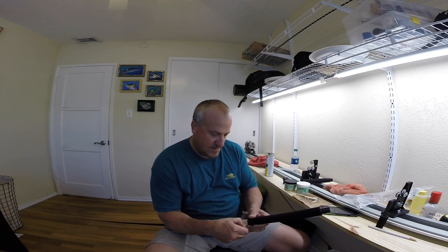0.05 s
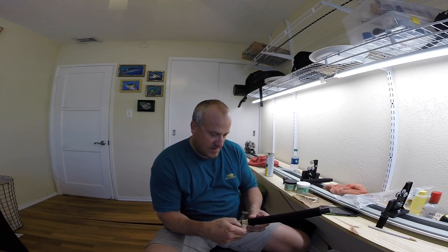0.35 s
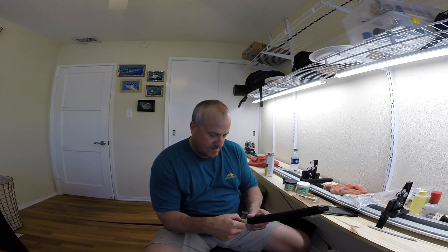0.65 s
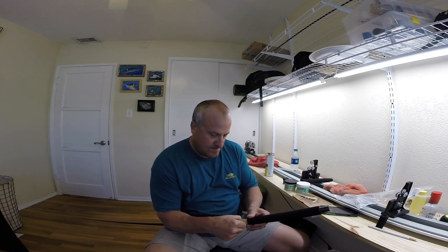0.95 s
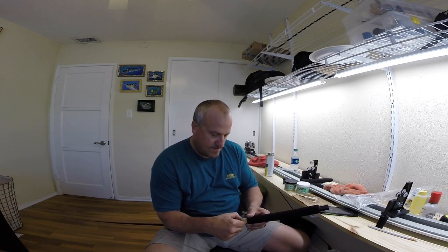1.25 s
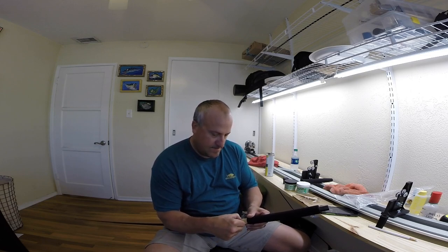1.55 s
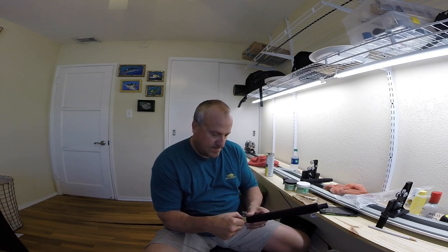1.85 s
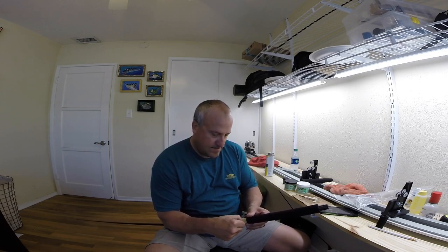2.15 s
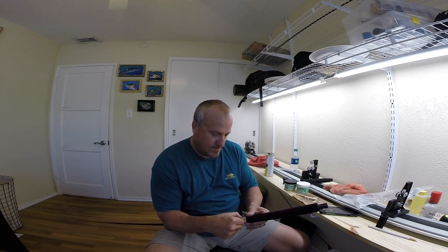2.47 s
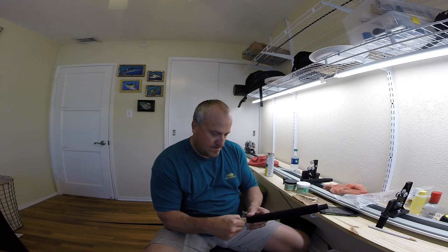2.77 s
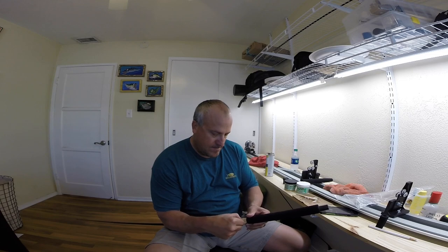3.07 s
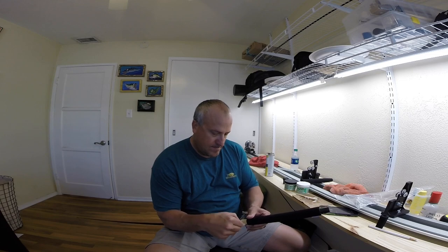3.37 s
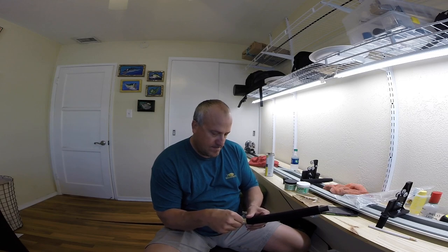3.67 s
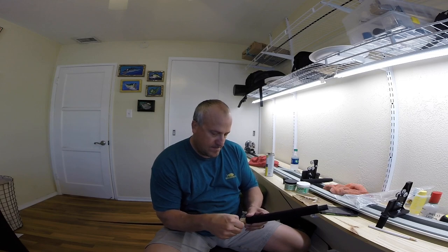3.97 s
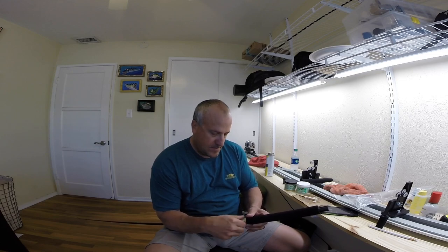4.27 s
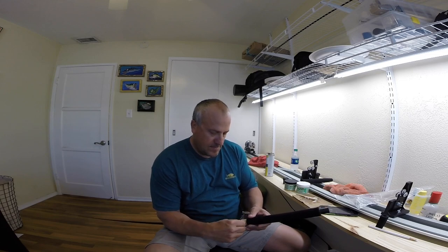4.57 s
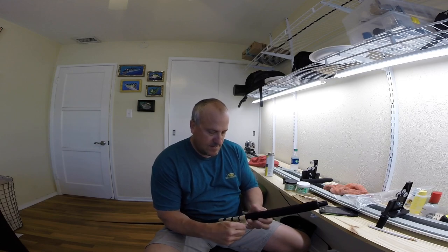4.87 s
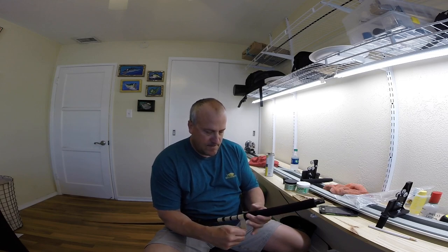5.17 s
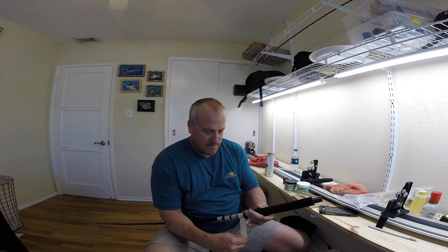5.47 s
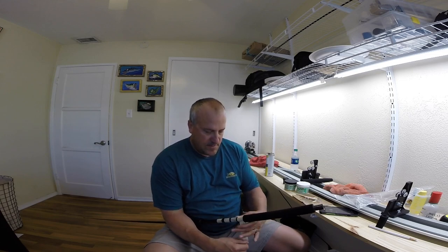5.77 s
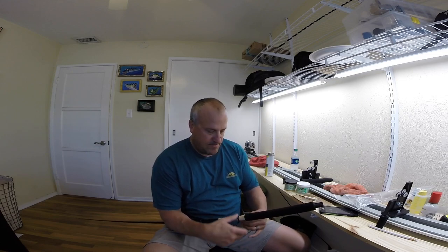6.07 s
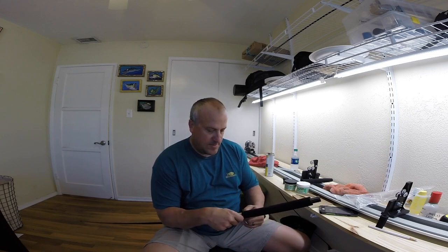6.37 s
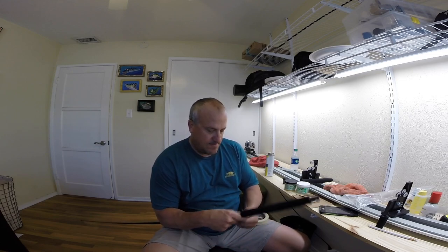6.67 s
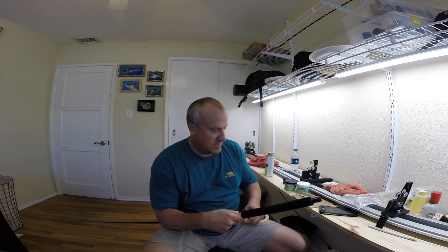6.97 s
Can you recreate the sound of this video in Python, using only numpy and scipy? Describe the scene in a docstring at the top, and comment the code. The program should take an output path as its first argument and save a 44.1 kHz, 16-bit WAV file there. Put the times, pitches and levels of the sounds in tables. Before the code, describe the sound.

Masking tape ticks softly, then is peeled and torn off a fishing rod with crackly rips over a steady low hum.

```python
"""First comes a short rasp of masking tape being picked at, over a steady mains hum.
The tape is being worked on a fishing rod blank: it ticks while taut, then is peeled and torn.
Its glue lets go in swarms of tiny clicks, hands knock, the paper cracks and the thin rod snaps and rings.
The microphone stands well away in a small bare room, so the room carries most of the sound."""
import sys
import numpy as np
from scipy import signal
from scipy.fft import rfft, irfft, next_fast_len
from scipy.io import wavfile
from scipy.ndimage import uniform_filter1d

SR = 44100
rng = np.random.default_rng(int(sys.argv[2]) if len(sys.argv) > 2 else 0)


def to_wav(sig):
    """Store sig (one row per channel, or 1-D mono) as 16-bit WAV at the path in sys.argv[1].

    Samples outside -1..1 are clipped; the rate is SR.
    """
    pcm = np.clip(np.atleast_2d(sig), -1, 1) * 32767
    pcm = np.round(pcm).astype(np.int16)
    wavfile.write(sys.argv[1], SR, pcm.T)  # frames by channels


N = 314433

# The tones of the mains hum. Each row: pitch in Hz, average (rms) level in dB.
HUM = [(60, -44), (120, -57.5), (180, -84)]
# A "colour" says how strong the lows and highs are. Each row: frequency in Hz, relative level in dB.
AIR_COLOUR = [(90, -8.5), (140, 2), (300, -3), (520, -7), (1000, -11.5), (1600, -15), (3000, -19.5),
              (6000, -27), (10000, -34.5), (13000, -39), (15000, -42)]
RUMBLE_COLOUR = [(10, -10), (25, 13), (42, 5.5), (75, 9), (110, 8.5), (140, -18), (190, -34), (400, -78)]
def background(air_db=-55, rumble_db=-58):
    """The mains hum steadily over the soft hiss and low rumble of the room."""
    t = np.arange(N) / SR
    hum = sum(amp(db) * np.sqrt(2) * np.sin(2 * np.pi * (hz * t + rng.random())) for hz, db in HUM)
    return hum + amp(air_db) * noise(AIR_COLOUR) + amp(rumble_db) * noise(RUMBLE_COLOUR)


# Finger strokes. Each row: start in seconds, end in seconds, final level in dB.
BRUSHES = [(0.062, 0.094, -44.5), (4.512, 4.538, -47), (4.639, 4.743, -47), (5.744, 5.748, -47),
           (5.986, 6.016, -52.5), (6.743, 6.815, -34.5)]
# The colour of their hiss. Each row: frequency in Hz, relative level in dB.
BRUSH_COLOUR = [(300, 3), (1500, 10.5), (4000, 11.5), (7000, 12), (11000, 7.5), (15000, -4)]
def finger_brushes():
    """Fingers slide over the paper backing, making clicks so dense that they blur into a hiss."""
    out = np.zeros(N)
    for start, end, db in BRUSHES:
        add(out, *swarm([(start, db - 6), (end, db)], BRUSH_COLOUR, per_s=6000, spread_db=3.5))
    return out


# Each pull's colour, set by the length of free tape. Each row: frequency in Hz, relative level in dB.
FIRST_COLOUR = [(150, -42), (400, -7.5), (600, -16), (850, -14.5), (1200, -7), (1700, -6), (2050, -5),
                (2400, -5), (2900, -8.5), (3600, -7.5), (5000, -11.5), (9500, -15), (15000, -28)]
SHORT_COLOUR = [(250, -12), (450, 1.5), (850, -17), (1300, 1), (1650, -4.5), (2300, -1.5), (3300, -1),
                (5000, -6), (8000, -8.5), (12000, -16.5), (15000, -24)]
LONG_COLOUR = [(180, -32), (300, -12), (444, -17), (490, -7), (691, -16.5), (1310, -1.5), (2070, -4),
               (3120, 0), (6950, -3.5), (15000, -20.5)]
STRETCH_COLOUR = [(120, -36), (200, -10.5), (476, -5.5), (521, -0.5), (570, -6), (1240, -9.5), (2290, -6.5),
                  (6420, -10), (15000, -26)]
TEAR_COLOUR = [(88, -55), (150, -26), (196, -46), (262, -12.5), (371, -8), (425, -7.5), (612, -9),
               (802, -14.5), (1570, -6), (2450, -11.5), (4720, -11), (15000, -32.5)]
LAST_COLOUR = [(100, -40), (200, -15), (300, -22), (430, -22), (700, -23), (1050, -17), (1900, -10),
               (3000, -3), (3900, -4), (4600, -11), (6200, -15), (8500, -23), (10700, -24.5), (15000, -44)]
# The pitches at which the hollow rod rings. Each row: pitch in Hz, width in Hz, boost in dB.
ROD_RINGS = [(3590, 260, 7), (5540, 440, 5), (7260, 450, 4), (9570, 970, 3)]
# Ways the tape lets go. Each named row: colour, clicks per second, spread of click sizes in dB, rings.
GRAINS = { "rasp": (FIRST_COLOUR, 3000, 3.7, [(2280, 320, 4)]),
          "short peel": (SHORT_COLOUR, 3300, 0.86, ()), "long peel": (LONG_COLOUR, 3100, 3.1, ()),
          "stretch": (STRETCH_COLOUR, 890, 3.5, ()), "tear": (TEAR_COLOUR, 1500, 2.7, ()),
          "off the rod": (LAST_COLOUR, 2200, .5, ROD_RINGS), }
# Pulls on the tape. Each row: time of full force in seconds, rise in seconds, hold in seconds,
# level in dB, way of letting go.
PULLS = [ (0.107, .05, 0.03, -33.5, "rasp"), (0.296, 0.024, .008, -54.5, "rasp"),
         (3.956, 0.074, 0.025, -42.5, "short peel"), (4.744, 0.052, 0.043, -32, "long peel"),
         (4.915, .06, 0.15, -42, "long peel"), (5.029, .05, 0.216, -39.5, "stretch"),
         (5.123, .04, 0.0075, -30, "stretch"), (5.299, .05, 0.22, -45.5, "stretch"),
         (5.457, .012, 0.047, -24, "tear"), (5.528, 0.028, 0.186, -47, "tear"),
         (6.79, 0.018, 0.016, -27, "off the rod"), (6.838, 0.045, 0.034, -22, "off the rod"),
         (6.954, .15, 0.038, -32.5, "off the rod"), ]
def tape_pulls(slack_db=32.5, release_db_per_s=802):
    """The hand takes up the slack, holds and eases off, while glue threads or fibres let go one by one."""
    out = np.zeros(N)
    for s, rise_s, hold_s, db, grain in PULLS:
        eased = s + hold_s
        end = eased + slack_db / release_db_per_s
        outline = [(s - rise_s, db - slack_db), (s, db), (eased, db), (end, db - slack_db)]
        add(out, *swarm(outline, *GRAINS[grain]))
    return out


# The pitches at which taut tape rings. Each row: pitch in Hz, width in Hz, boost in dB.
TAPE_RINGS = [(1350, 190, 10), (1950, 300, 4), (2840, 260, 10.5)]
# Things a snap sets ringing. Each named row: rings, bass boost in dB.
BODIES = {"taut tape": (TAPE_RINGS, 1), "slack tape": ([], -11.5), "rod": (ROD_RINGS, -13)}
# The colour all snaps start from. Each row: frequency in Hz, relative level in dB.
SNAP_COLOUR = [(60, -16), (200, -1), (330, -0.5), (480, -1.5), (700, -3), (1150, 0.5), (2200, 2.5),
               (3000, 0), (6000, -2.5), (13000, -5.5), (16000, -5)]
# Ticks and snaps. Each row: start in seconds, energy in dB, what rings, pitch the grip favours in Hz,
# its boost in dB, edge where the treble falls away in Hz, treble tilt in dB per octave.
SNAPS = [ (1.024, -10, "taut tape", 1400, 0.5, 7100, -3.5), (1.655, -16, "taut tape", 1100, 9, 9800, -7.5),
         (2.188, -11, "taut tape", 1130, 6, 11500, -7), (2.733, -14.5, "taut tape", 10100, 7, 13500, -4.5),
         (3.168, -17, "taut tape", 10800, 15, 13500, -9.5), (3.363, -27.5, "taut tape", 3720, 4, 6000, -5),
         (5.23, 14, "rod", 4280, 7, 7460, -5), (5.56, 12, "slack tape", 1244, 7.5, 7200, -3),
         (6.016, -10.5, "rod", 4570, 17, 9300, -0.5), (6.170, -18.5, "slack tape", 2300, 7, 6900, -5.5),
         (6.360, 3.5, "rod", 3900, 7.5, 8400, -3), (6.779, 7, "rod", 3420, 6.5, 8700, -2), ]
def snaps(ripple_db=2.0, edge_slope=5.3, bass_hz=600, pivot_hz=1500):
    """A sudden release rings the tape or rod; the highs travel out first, so it chirps downwards."""
    out = np.zeros(N)
    hz = bins()
    for s, db, body, grip_hz, grip_db, edge_hz, tilt_db in SNAPS:
        rings, body_bass_db = BODIES[body]
        # a harder release is duller above its edge, has less bass and chirps for longer
        floor_db = -23 - db
        bass_db = body_bass_db - 0.1 * db
        chirp_s = 0.001552 * amp(0.47 * db)
        grip_width_hz = 170 * (1 + (grip_hz / 4400) ** 2)  # higher rings die sooner, so they are wider
        ringing = lift(rings + [(grip_hz, grip_width_hz, grip_db)], hz)
        # many weaker rings, different with every grip, make the treble uneven
        ripple = evened(np.convolve(rng.standard_normal(len(hz)), signal.windows.hann(40), "same"))
        ringing += ripple_db * ripple * hz / (hz + pivot_hz)
        # the quicker the release, the higher the edge
        rolloff = 1 / np.sqrt(1 + (hz / edge_hz) ** (2 * edge_slope))
        treble = 20 * np.log10(rolloff + amp(floor_db))
        tone = bass_db / (1 + (hz / bass_hz) ** 2) + tilt_db * np.log2(hz + pivot_hz)
        snap = amp(db) * click(read(SNAP_COLOUR, hz) + ringing + treble + tone, bending_delay(chirp_s))
        add(out, s, room(snap, direct_db=-9, early_db=-6))
    return out


# Dull knocks. Each row: start in seconds, energy in dB, pitch in Hz.
KNOCKS = [(3.889, -18.5, 210), (3.935, -22.5, 194), (5.232, -4.5, 250), (5.491, -5, 377), (5.773, -11, 375),
          (6.366, -14.5, 262), (6.786, -7, 293), (6.85, -18, 333)]
def knocks(decay_s=0.0022):
    """Hands and rod knock: a few soft vibrations that die away quickly."""
    out = np.zeros(N)
    t = np.arange(SR // 10) / SR
    for s, db, hz in KNOCKS:
        wave = t * np.exp(-t / decay_s) * np.sin(2 * np.pi * hz * t)
        add(out, s, room(amp(db) * wave / np.linalg.norm(wave), direct_db=-5))
    return out


# The colour of a paper crack. Each row: frequency in Hz, relative level in dB.
CRACK_COLOUR = [(100, -5), (300, -18), (800, 8), (1400, 12.5), (2700, 9), (4200, 10.5), (7500, 2.5),
                (15000, -14.5)]
# Single sharp cracks. Each row: start in seconds, energy in dB, ringing pitch in Hz.
CRACKS = [(4.885, -9, 2600), (4.933, -5, 2620), (5.023, -5, 1820), (5.036, -7, 1040), (5.058, -4.5, 1930),
          (5.099, -11, 7000), (5.216, -17, 2800), (5.453, -9, 4540), (5.491, -2.5, 1500), (5.518, -1, 2500),
          (5.759, -7, 6400), (5.7747, -2, 2300), (5.994, -21, 5030), (6.974, -17, 3170)]
def paper_cracks(width_hz=550, boost_db=8, chirp_s=0.00044):
    """A crease in the paper flips and rings for an instant."""
    out = np.zeros(N)
    for s, db, hz in CRACKS:
        colour = read(CRACK_COLOUR, bins()) + lift([(hz, width_hz, boost_db)], bins())
        crack = amp(db) * click(colour, bending_delay(chirp_s))
        add(out, s, room(crack, direct_db=-1, early_db=-2.5))
    return out


# How long the room echoes. Each row: frequency in Hz, seconds taken to fade by 60 dB.
ROOM_FADE = [(200, 0.45), (530, 0.56), (1400, 0.54), (3700, 0.54), (8000, 0.47), (14000, 0.39)]
def room(x, direct_db=-7, early_db=-7, early_s=0.02, gap_s=0.000987, build_s=0.0076):
    """The sound arrives directly, then bounces off bench and wall, then blurs into a fading tail."""
    t = np.arange(SR * 3 // 4) / SR
    hz, when, hiss = signal.stft(rng.standard_normal(len(t)), SR, nperseg=256)
    fade = amp(-60 * when / read(ROOM_FADE, hz)[:, None])
    tail = signal.istft(hiss * fade, SR)[1][:len(t)]
    tail *= np.clip(t / build_s, 0, 1)
    echo_times = gap_s + early_s * rng.random(size=20)  # new for each sound, as the hands move
    early = np.zeros(len(t))
    early[(echo_times * SR).astype(int)] = rng.choice([-1, 1], size=20)
    response = tail / np.linalg.norm(tail) + amp(early_db) * early / np.linalg.norm(early)
    response[0] += amp(direct_db)
    # the room keeps its narrow peaks and dips but favours no broad range of pitch
    spectrum = rfft(response, 2 * len(t))
    broad = np.sqrt(uniform_filter1d(abs(spectrum) ** 2, size=500))
    return signal.fftconvolve(x, irfft(spectrum / broad)[:len(t)])


def swarm(outline, colour, per_s, spread_db, rings=()):
    """Uneven clicks in the room follow an outline of (seconds, dB) points; returns start and sound."""
    s, level_db = np.transpose(outline)
    fires = rng.random(SR) < per_s / SR
    size = amp(spread_db * np.minimum(rng.exponential(1, SR), 4))
    sign = rng.choice([-1, 1], SR)
    spikes = evened(fires * sign * size)
    t = np.arange(s[0], s[-1], 1 / SR)
    stroke = spikes[:len(t)] * amp(np.interp(t, s, level_db))
    grain = click(read(colour, bins()) + lift(rings, bins()))
    return s[0], room(signal.fftconvolve(stroke, grain), direct_db=-2.5)


def click(colour_db, delay_s=0):
    """A click of this colour with an energy of one; each frequency may arrive with its own delay."""
    log_gain = np.log(amp(np.maximum(colour_db - np.max(colour_db), -90)))
    mirrored = np.concatenate([log_gain, log_gain[-2:0:-1]])
    phase = -signal.hilbert(mirrored).imag[:len(colour_db)]  # packs the energy at the start
    phase -= 2 * np.pi * np.cumsum(delay_s * np.gradient(bins()))
    wave = irfft(np.exp(log_gain + 1j * phase))
    return wave / np.linalg.norm(wave)


def bending_delay(chirp_s):
    """How many seconds each frequency lags: bending waves travel faster the higher they are."""
    delay = chirp_s * np.sqrt(1000 / (bins() + 100))
    return delay - delay[-1]


def noise(colour):
    """Steady noise of a given colour."""
    size = next_fast_len(N, True)
    spectrum = rfft(rng.standard_normal(size)) * amp(read(colour, bins(size)))
    return evened(irfft(spectrum)[:N])


def lift(rings, hz):
    """The boost in dB that a set of rings gives each frequency."""
    return sum(db / (1 + (2 * (hz - pitch) / width) ** 2) for pitch, width, db in rings)


def amp(db):
    """Turns decibels into a multiplier."""
    return 10 ** (np.asarray(db) / 20)


def evened(x):
    """Scales a signal to an average (rms) level of one."""
    return x / np.sqrt(np.mean(x ** 2) + 1e-20)


def read(points, hz):
    """Reads between the rows of a table, with octaves evenly spaced."""
    row_hz, value = np.transpose(points)
    return np.interp(np.log(hz + 1), np.log(row_hz + 1), value)


def bins(size=4096):
    """The frequencies in Hz at which a sound is shaped."""
    return np.fft.rfftfreq(size, 1 / SR)


def add(mix, s, sound):
    """Lays a sound into the mix, starting at s seconds."""
    part = mix[max(round(s * SR), 0):][:len(sound)]
    part += sound[:len(part)]


def scene():
    """Tape and rod in the humming room, as one channel."""
    return (tape_pulls() + finger_brushes() + snaps() + paper_cracks() + knocks() + background())[None]


def record(dry):
    """The recorder cuts off the treble above 15500 Hz."""
    lowpass = signal.firwin(511, 15500, window=("kaiser", 9), fs=SR)
    return signal.oaconvolve(dry, lowpass[None], "same")


dry = scene()
out = record(dry)
to_wav(out)
```